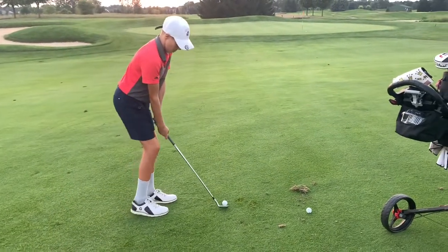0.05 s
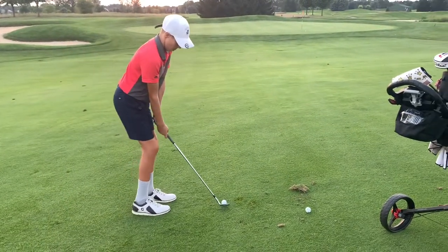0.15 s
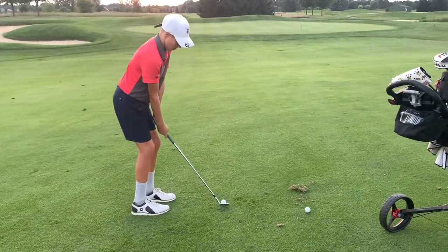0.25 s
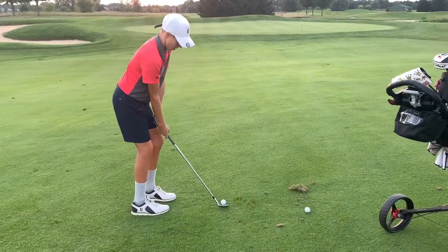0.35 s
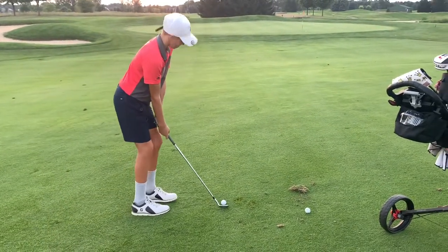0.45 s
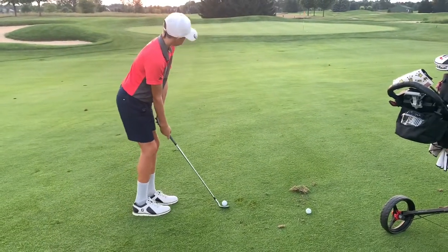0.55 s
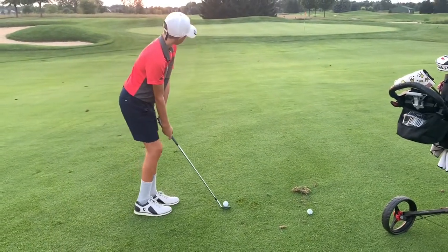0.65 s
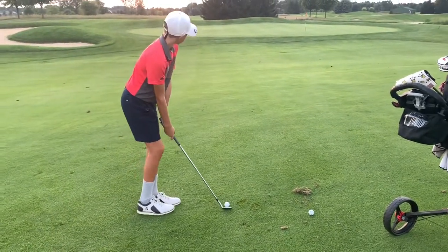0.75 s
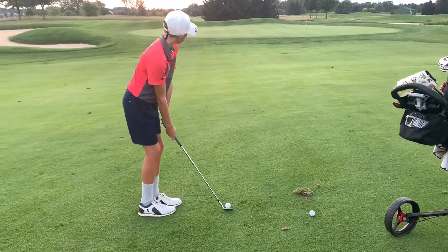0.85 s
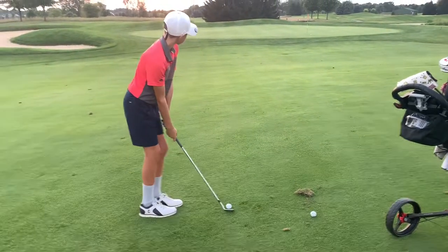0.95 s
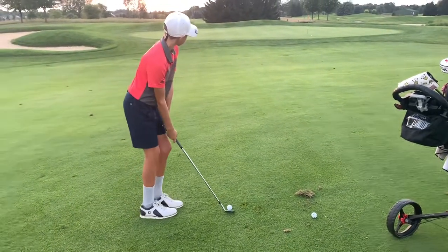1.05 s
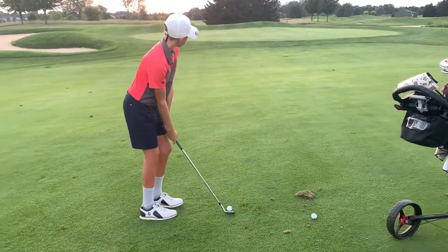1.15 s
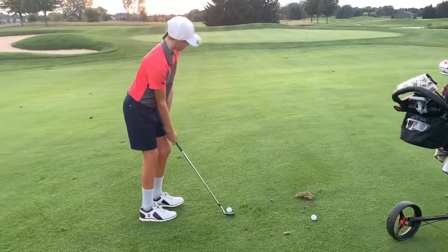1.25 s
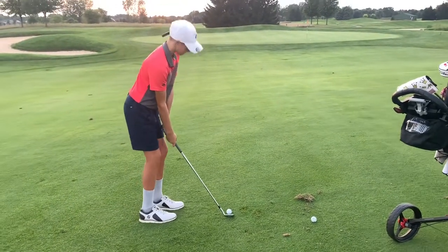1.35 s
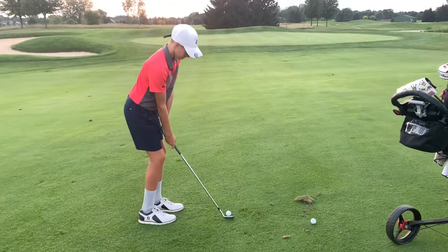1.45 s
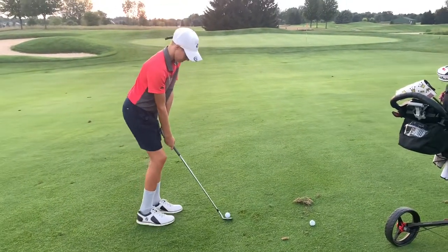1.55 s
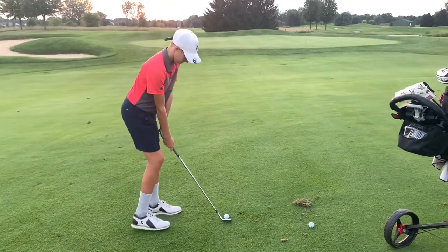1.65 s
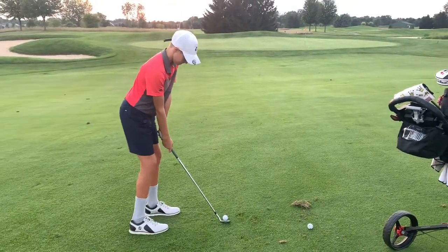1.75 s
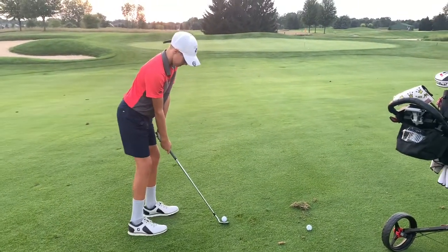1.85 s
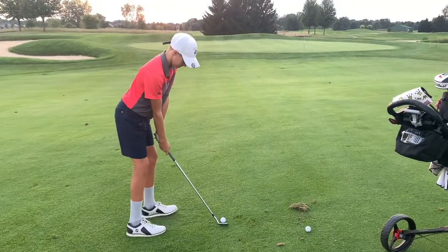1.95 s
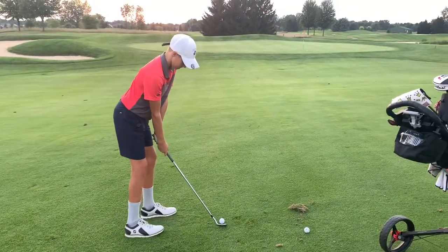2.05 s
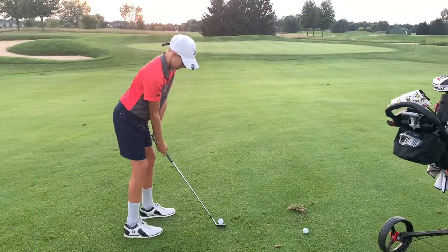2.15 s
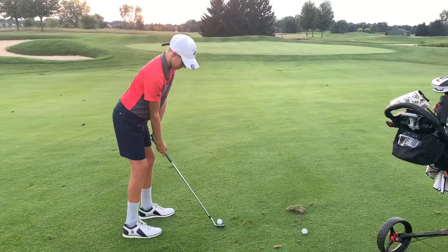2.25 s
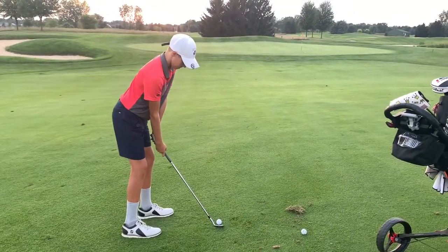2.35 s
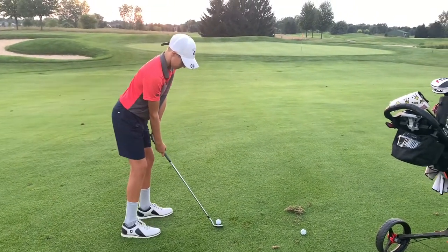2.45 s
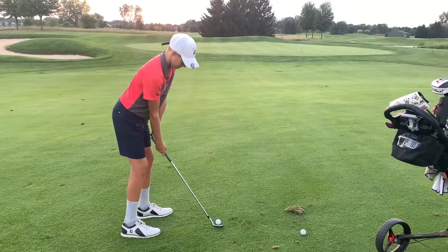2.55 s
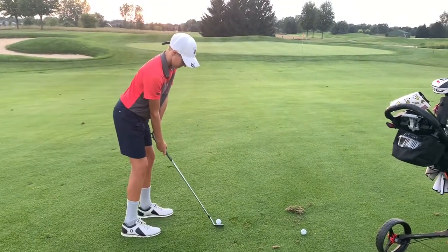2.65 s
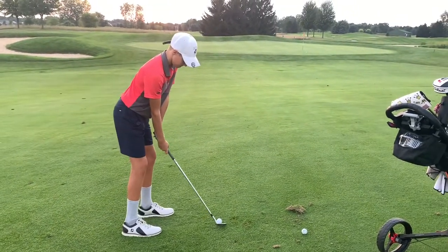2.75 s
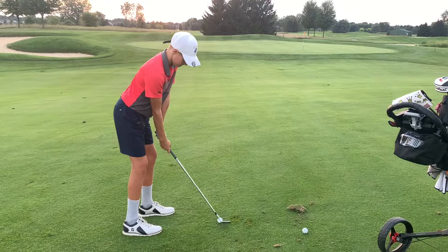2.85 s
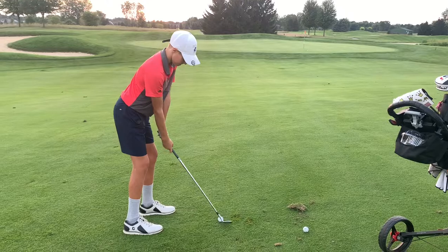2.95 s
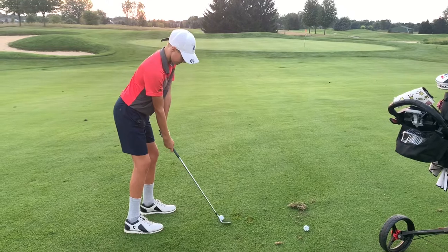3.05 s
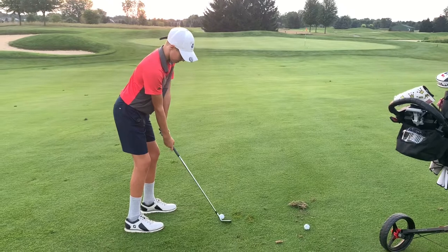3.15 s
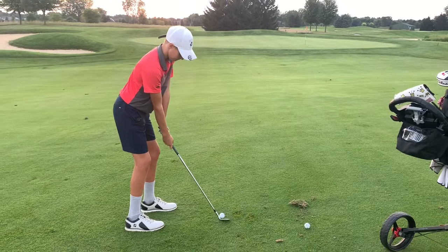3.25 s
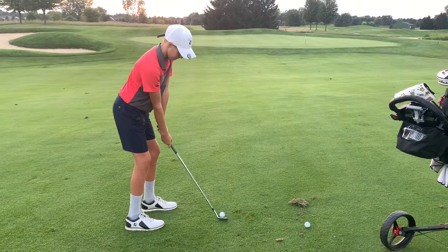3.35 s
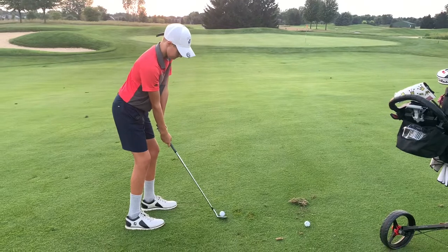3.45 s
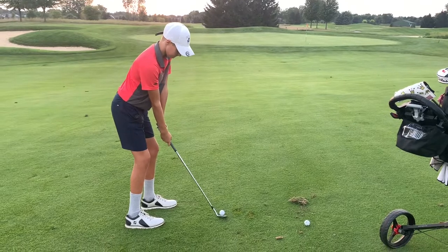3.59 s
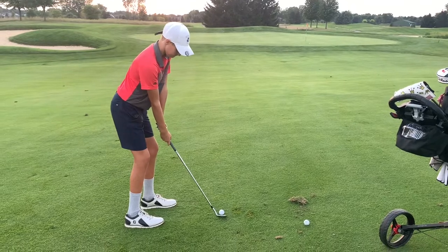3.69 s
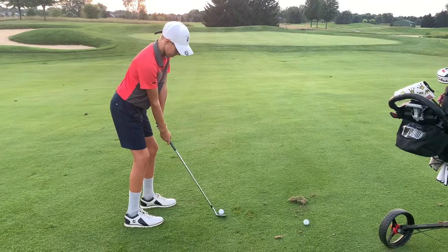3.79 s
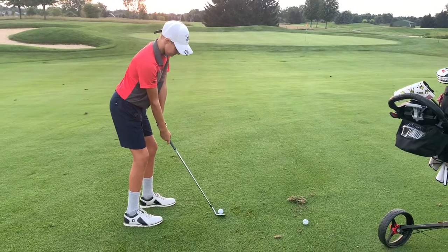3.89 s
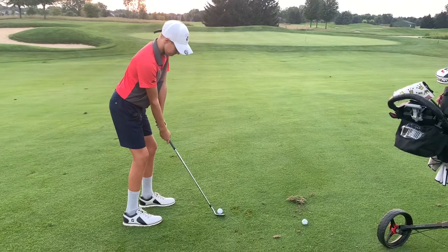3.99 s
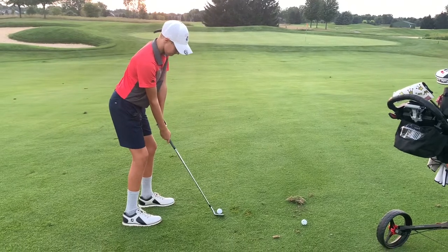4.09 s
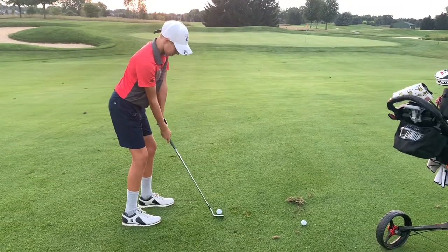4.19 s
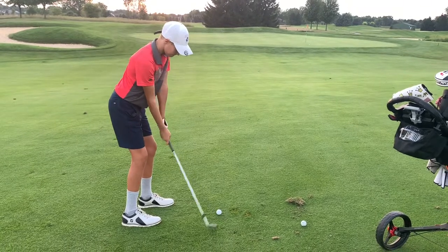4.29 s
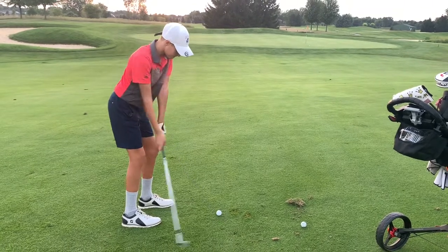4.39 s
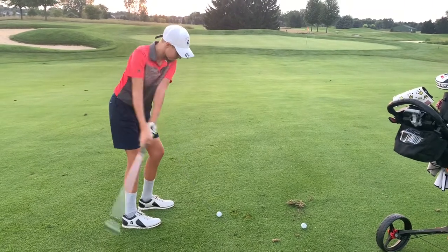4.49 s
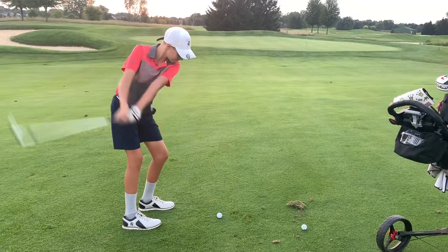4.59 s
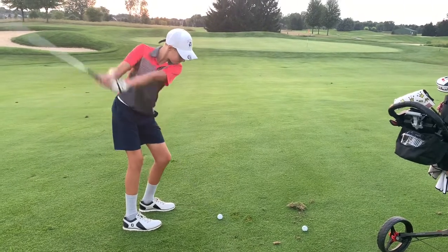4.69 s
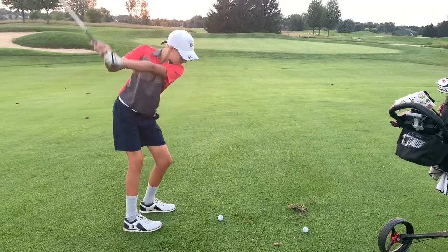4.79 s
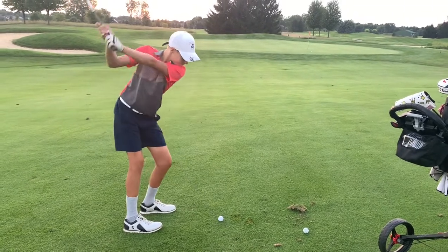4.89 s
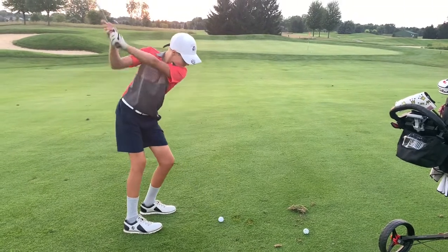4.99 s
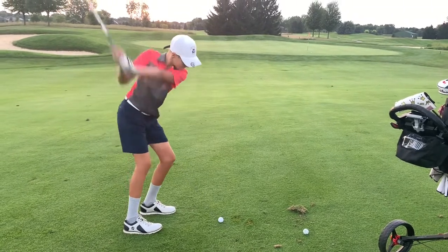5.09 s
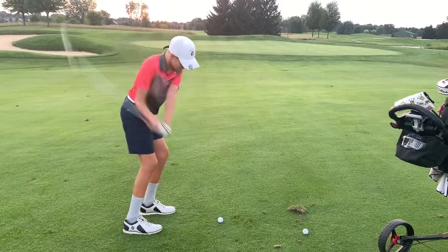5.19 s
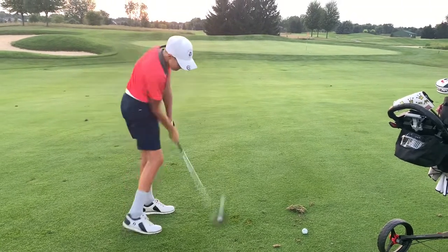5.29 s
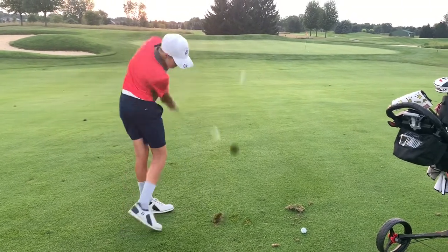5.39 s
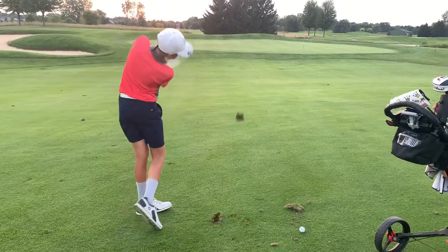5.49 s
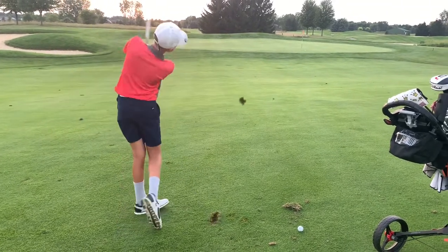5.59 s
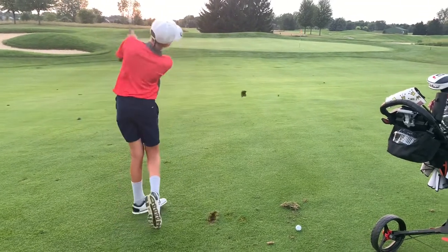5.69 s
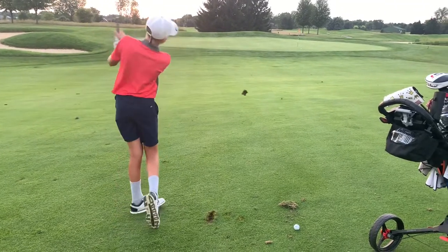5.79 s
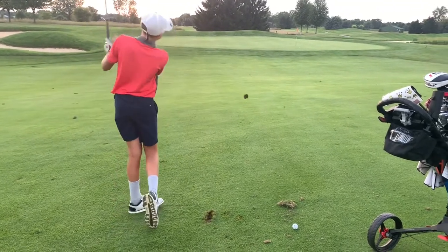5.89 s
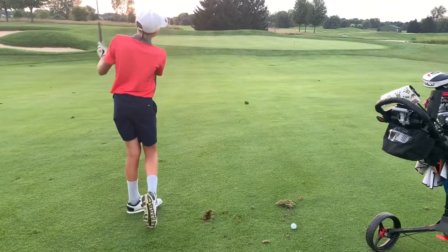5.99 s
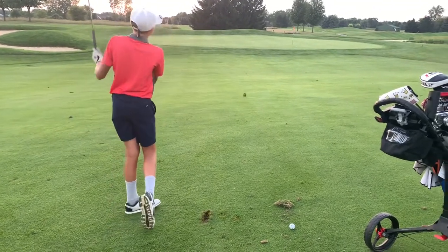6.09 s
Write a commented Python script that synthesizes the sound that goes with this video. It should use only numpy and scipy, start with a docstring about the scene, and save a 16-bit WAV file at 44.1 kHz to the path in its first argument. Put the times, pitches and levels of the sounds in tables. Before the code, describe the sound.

Faint clicks and cloth rustle over far traffic hum and thin bird calls, until a club swishes and cracks a ball off the grass.

```python
"""Golf shot from the turf

A golfer hits an iron shot a few steps from a pair of microphones: filtered noise makes the swing and
the torn grass, and short pushes ring the tones of the strike. Far off, a few low tones throb as an
engine, shaped noise hums as traffic and chirrs as insects, and gliding tones whistle as small birds.
Clothes, shoes and gear rustle as shaped noise and tick as short rings."""
import sys
import numpy as np
from scipy import signal
from scipy.fft import rfft, irfft, next_fast_len
from scipy.io import wavfile
from scipy.ndimage import uniform_filter1d

SR = 44100
rng = np.random.default_rng(int(sys.argv[2]) if len(sys.argv) > 2 else 0)


def persist_wave(psi):
    """Save psi, clipped to +-1, as 16-bit WAV."""
    counts = np.round(np.clip(psi, -1, 1) * 32767).astype(np.int16)
    wavfile.write(sys.argv[1], SR, np.atleast_2d(counts).T)


N = 270405  # length in samples


def gain_of(db):
    """Turns decibels into a factor on the wave."""
    return 10 ** (np.asarray(db) / 20)


def evened(x):
    """Scales a sound to an average (rms) level of 1."""
    return x / np.sqrt(np.mean(x ** 2) + 1e-20)


def read(points, hz):
    """Reads a frequency curve at hz, along a logarithmic pitch axis."""
    f, value = np.transpose(points)
    return np.interp(np.log(hz + 1), np.log(f + 1), value)


def along(rows):
    """Reads the columns of a time curve at every sample."""
    s, *columns = np.transpose(rows)
    return [np.interp(np.arange(N) / SR, s, c) for c in columns]


def add(mix, s, sound):
    """Adds a sound to the mix from s seconds on."""
    part = mix[round(s * SR):][:len(sound)]
    part += sound[:len(part)]


def swell(s, rise, hold, fall, db):
    """A level that is full from s on for the hold, with 20 dB slopes per rise and fall time."""
    t = np.arange(N) / SR - s
    return gain_of(db - 20 * np.maximum(np.maximum(-t / rise, (t - hold) / fall), 0))


def resonate(x, hz, width):
    """A resonance of gain 1: shifts the pitch hz down to zero, smooths, and shifts back."""
    turn = np.exp(2j * np.pi * np.cumsum(hz * np.ones(x.shape[-1])) / SR)
    r = np.exp(-np.pi * width / SR)
    return 2 * (turn * signal.lfilter([1 - r], [1, -r], x / turn)).real


def band(x, hz, width):
    """Two equal resonances in a row, brought to an average level of 1."""
    return evened(resonate(resonate(x, hz, width), hz, width))


def flutter(ms):
    """Smooth random wandering of unit spread that changes over ms milliseconds."""
    size = max(round(ms * SR / 1000), 1)
    return evened(uniform_filter1d(uniform_filter1d(rng.standard_normal(N), size), size))


# How much the two channels differ, for near sounds and for far ones.
# Each row: frequency in Hz, share of the power that is opposite in left and right (0 to 1).
NEAR_APART = [(60, .01), (300, 0.014), (1000, 0.064), (3000, 0.041), (5000, 0.17), (8000, 0.01),
              (15000, .02)]
FAR_APART = [(60, 0.009), (150, 0.082), (300, 0.21), (800, 0.53), (1500, 0.82), (2500, 0.46), (5500, 0.91),
             (8000, 0.017), (15000, .02)]


def white(apart):
    """Two channels of noise, alike but for a share that depends on frequency."""
    size = next_fast_len(N, True)
    alike, opposite = rfft(rng.standard_normal((2, size)))
    share = read(apart, np.fft.rfftfreq(size, 1 / SR))
    pair = np.sqrt(1 - share) * alike + np.sqrt(share) * np.array([opposite, -opposite])
    return irfft(pair, size)[:, :N]


def coloured(x, spectrum):
    """Shapes noise by a frequency curve in dB and brings it to an average level of 1."""
    size = next_fast_len(N, True)
    gain = gain_of(read(spectrum, np.fft.rfftfreq(size, 1 / SR)))
    return evened(irfft(rfft(x, size) * gain, size)[:, :N])


# Colour of distant traffic, with faint microphone hiss in the treble.
# Each row: frequency in Hz, relative level in dB per Hz.
HUM_COLOUR = [(18, -47), (30, -27.5), (43, -7.5), (70, -5), (150, -14), (260, -18), (355, -23.5),
              (844, -25), (1350, -37.5), (1680, -33.5), (2050, -44), (2800, -54), (3500, -64), (5900, -66),
              (7000, -61), (9000, -62), (11000, -60), (14000, -61), (16000, -79)]
# Loudness of the hum and hiss together. Each row: time in seconds, level in dB.
HUM_LEVEL = [(0, -50), (1, -53.5), (2, -52.5), (3, -52.5), (4, -53.5), (5, -52.5), (6.13, -50)]


def traffic():
    """A wide hum (and faint hiss) of shaped noise whose level drifts in patches of time and pitch."""
    _, _, grid = signal.stft(coloured(white(FAR_APART), HUM_COLOUR), nperseg=1024)
    patches = uniform_filter1d(rng.standard_normal(grid.shape[1:]), 8, 0)
    patches = evened(uniform_filter1d(patches, 8, 1))
    hum = signal.istft(grid * gain_of(2.1 * patches), nperseg=1024)[1][:, :N]
    return gain_of(along(HUM_LEVEL)[0]) * evened(hum)


# Tyres on a far road swell and pass.
# Each row: time in seconds, level in dB before a slight flutter, middle pitch in Hz.
TYRES = [(0, -86.5, 780), (1.5, -69.5, 754), (2.5, -66, 846), (3.5, -65, 856), (4.3, -62, 890),
         (5, -60.5, 870), (6.13, -64.5, 890)]


def road():
    """Tyre roar is noise gathered in one broad band of moving pitch."""
    db, hz = along(TYRES)
    return gain_of(db + 1.26 * flutter(40)) * band(white(FAR_APART), hz, 450)


# The engine tones that carry. Each row: multiple of the firing rate, relative level in dB.
ENGINE_TONES = [(3, 0), (4, 1.5), (5, -5)]
# Engine speed. Each row: time in seconds, firings per second.
ENGINE_SPEED = [(0, 19.7), (1.5, 19.73), (3.3, 19.79), (4.2, 19.92), (5.2, 19.8), (6.13, 19.7)]
# How the throb carries over the distance. Each row: time in seconds, level in dB,
# loss in dB for each multiple above the third, spread of the wavering in dB.
ENGINE_CARRY = [(0, -50, 0, 1.2), (1, -51, 1.5, 1.2), (2.4, -50.5, 0.2, 1.2), (2.8, -50.5, 4.5, 2.5),
                (3.8, -54, 5.5, 2.5), (4.7, -56, 1.5, 2.5), (5.45, -52, -1, 2.5), (6.13, -54, -1, 2.5)]


def engine():
    """Three low multiples of the firing rate survive the distance; higher ones arrive a little later."""
    firings = .07 + np.cumsum(along(ENGINE_SPEED)[0]) / SR
    level_db, loss_db, waver_db = along(ENGINE_CARRY)
    throb = np.zeros(N)
    for k, db in ENGINE_TONES:
        tone_db = level_db + db - loss_db * (k - 3) + waver_db * flutter(70)
        lag = .035 * (k - 4)  # in firings
        throb += np.sqrt(2) * gain_of(tone_db) * np.cos(2 * np.pi * k * (firings - lag))
    return throb


# Bands of the insect chorus. Each row: pitch in Hz, width of each resonance in Hz, relative level in dB.
INSECT_BANDS = [(4623, 530, -2.5), (5110, 440, -4)]
# Loudness of the chorus. Each row: time in seconds, level in dB.
INSECT_LEVEL = [(0, -66.5), (1, -70), (2, -69), (3, -69.5), (4, -70), (5, -69.5), (6.13, -66.5)]


def insects():
    """Bands of noise stand for many overlapping wing strokes, each band trembling on its own."""
    chorus = sum(gain_of(db + 1.8 * flutter(8)) * band(white(FAR_APART), hz, width)
                 for hz, width, db in INSECT_BANDS)
    return gain_of(along(INSECT_LEVEL)[0]) * chorus


# The climb of a whistle. Each row: share of the time after the hook, share of the rise in pitch,
# share of the swell in level.
WHISTLE_CLIMB = [(0, 0, 0), (.12, .22, .33), (.36, .35, .58), (.5, .46, .68), (.66, .59, .8),
                 (.76, .64, .8), (.84, .75, .83), (.95, 1, .97), (1, .95, 1)]
HOOK_UP_S, HOOK_DOWN_S = .016, .03
HOOK_FROM = .91  # first pitch, as a share of the top
SHOULDER_S, SHOULDER = .008, .975  # the hook is round: just before and after its top, this share of the top
END_S, END_DROP, END_DB = .014, .96, -25  # the abrupt end: seconds, share of the last pitch, change in dB


def whistle(start, length, top_hz, low_hz, last_hz, hook_db, low_db, last_db, late):
    """One call as time, pitch and level: a hook up and down, then a climb and swell to an abrupt end."""
    share, rise, grow = np.transpose(WHISTLE_CLIMB)
    hook = HOOK_UP_S + HOOK_DOWN_S
    climb_s = hook + share * (length - hook)
    climb_hz = low_hz + rise ** late * (last_hz - low_hz)
    climb_db = low_db + grow ** max(late, 1) * (last_db - low_db)
    s = [0, HOOK_UP_S - SHOULDER_S, HOOK_UP_S, HOOK_UP_S + SHOULDER_S, *climb_s, length + END_S]
    shoulder_hz = SHOULDER * top_hz
    hz = [HOOK_FROM * top_hz, shoulder_hz, top_hz, shoulder_hz, *climb_hz, END_DROP * last_hz]
    db = [hook_db - 15, hook_db - 2.5, hook_db, hook_db - 2.5, *climb_db, last_db + END_DB]
    return start + np.array(s), hz, db


# Whistled calls. Each row: start in seconds, length in seconds, top of the hook in Hz, low pitch in Hz,
# last pitch in Hz, then the levels of hook, low and last in dB (all birds are later raised together),
# lateness of the climb (1 is even), phase in radians added on the left and taken off on the right.
WHISTLES = [(.42, .26, 4600, 4500, 4480, -90, -84, -77, 1, .07),
            (.998, .45, 4680, 4040, 4550, -49, -80, -49.5, .8, 0),
            (1.968, .06, 6900, 6600, 6600, -82, -95, -99, 1, 0),
            (3.6, .466, 4710, 4090, 4570, -53, -80, -51, 1, 0),
            (3.905, .275, 4700, 4200, 4540, -69, -82, -67, 2.2, .13),
            (5.4, .47, 7270, 6550, 7050, -84, -106, -88, 2, 0)]
# Wavering tunes, one curve each. Each row of a curve: time in seconds, pitch in Hz, level in dB (as above).
TUNES = [
    [(1.885, 4640, -76), (1.9, 4630, -69), (1.916, 4020, -73), (1.93, 3880, -74), (1.95, 3830, -75),
     (2.01, 4060, -72), (2.028, 3980, -69), (2.1, 4020, -72), (2.13, 4030, -68), (2.165, 4140, -68),
     (2.212, 3970, -65), (2.235, 4030, -76)],
    [(1.975, 4600, -80), (1.99, 4560, -74), (2.012, 4060, -74), (2.06, 4130, -70), (2.1, 4120, -73),
     (2.14, 4370, -74), (2.21, 4360, -74), (2.25, 4460, -72), (2.34, 4510, -69), (2.38, 4500, -72),
     (2.42, 4620, -71), (2.5, 4560, -73), (2.55, 4630, -68), (2.61, 4600, -76)],
    [(2.3, 4420, -78), (2.34, 4380, -74), (2.38, 4240, -76), (2.43, 4310, -73), (2.56, 4310, -72),
     (2.62, 4480, -72), (2.67, 4700, -69), (2.7, 4700, -80)],
    [(4.625, 4400, -78), (4.64, 4520, -70), (4.665, 4110, -75), (4.71, 4130, -74), (4.77, 4290, -75),
     (4.81, 4270, -77), (4.85, 4240, -67), (4.92, 4340, -74), (4.98, 4460, -69), (5.035, 4630, -62),
     (5.05, 4600, -65), (5.062, 4500, -85)],
    [(5.4, 4600, -78), (5.415, 4760, -69), (5.44, 4180, -77), (5.49, 4120, -86), (5.53, 4150, -76),
     (5.6, 4230, -81), (5.64, 4420, -74), (5.72, 4450, -80), (5.8, 4530, -75), (5.865, 4710, -70),
     (5.91, 4600, -76), (5.955, 4700, -71), (5.97, 4650, -82)],
]
# One value per tune: phase in radians added on the left and taken off on the right.
TUNE_BEARINGS = [0, 1.7, 1.7, .48, .17]


def birds():
    """Near-sine whistles with a slight waver and a faint smear from the trees."""
    out = np.zeros((N, 2))
    waver, tremble, wander = flutter(3), flutter(7.6), flutter(25)
    calls = [(whistle(*row[:-1]), row[-1]) for row in WHISTLES]
    calls += [(np.transpose(tune), bearing) for tune, bearing in zip(TUNES, TUNE_BEARINGS)]
    for (s, hz, db), bearing in calls:
        t = np.arange(s[0], s[-1], 1 / SR)
        at = (t * SR).astype(int)
        loud_db = np.interp(t, s, db)
        # faint birds are far away, and the air between breaks them up more
        faint = np.clip(-63.5 - loud_db, 0, 12)
        pitch = uniform_filter1d(np.interp(t, s, hz), 300, mode="nearest")
        pitch = pitch * (1 + 0.0016 * waver[at] + .0006 * faint * wander[at])
        level = gain_of(loud_db + (.65 + .3 * faint) * tremble[at])
        level = level * signal.windows.tukey(len(t), 400 / len(t))  # soft start and end
        angle = 2 * np.pi * np.cumsum(pitch) / SR + bearing * np.array([[1], [-1]])
        add(out, s[0], (np.sqrt(2) * level * np.sin(angle)).T)
    # the trees: noise that starts 12 ms late and dies by 60 dB per .31 s
    t = np.arange(SR // 4) / SR
    trees = rng.standard_normal((2, len(t))) * gain_of(-60 * t / 0.31) * (t > .012)
    trees = trees / np.linalg.norm(trees[0])
    smear = signal.oaconvolve(out.T, trees, axes=1)[:, :N]
    return gain_of(1) * (out.T + gain_of(-15.5) * smear)


# Small ticks of gear. Each row: start in seconds, level in dB before a boost shared by all ticks,
# pitch in Hz, cycles until the ring has lost 30 dB.
GEAR_TICKS = [(.008, -55, 5700, 35), (.008, -52, 6500, 40), (.008, -58, 7900, 40), (.058, -56, 6800, 30),
              (.061, -55, 6300, 35), (0.569, -54, 2520, 13), (.627, -57, 2800, 8), (.807, -55, 2300, 7),
              (.809, -56, 1900, 8), (.836, -46, 1300, 3), (.836, -48, 3000, 9), (.8375, -47, 2000, 9),
              (.8402, -44.5, 2200, 14), (.8488, -43, 2260, 14), (.8425, -51, 3100, 8), (.846, -52, 2800, 7),
              (.846, -54, 3900, 9), (.852, -49.5, 3800, 10), (.8565, -52, 2600, 7), (.861, -50, 2900, 7),
              (.861, -54, 2000, 7), (.867, -52, 2600, 9), (.876, -53, 2500, 8), (.951, -45, 800, 4),
              (0.9894, -46, 5200, 2.3), (1.493, -47, 840, 5), (1.508, -44, 1500, 4.5),
              (1.513, -52, 1700, 8), (1.533, -45, 1400, 4.5), (1.553, -52, 1900, 5), (1.567, -63, 3100, 12),
              (2.185, -66, 3400, 9.2), (2.291, -40, 900, 4.5), (2.708, -44, 800, 4), (4.22, -46, 650, 4),
              (3.4286, -40.5, 4730, 4.6), (5.56, -47, 1150, 5), (5.027, -54, 3100, 3.5),
              (5.071, -43, 3000, 3), (5.071, -45, 4400, 9), (6.114, -34.5, 2000, 3.3),
              (6.124, -37.5, 1660, 16)]
# Hollow knocks. Each row: start in seconds, level in dB (as above), lowest pitch in Hz,
# extra level of the lowest tone in dB.
HOLLOW_KNOCKS = [(.7497, -43, 1060, 6.5), (1.616, -56, 1060, 0), (1.7088, -43.5, 1070, -10)]
# Tones of a hollow knock. Each row: multiple of the lowest pitch, relative level in dB, cycles (as above).
HOLLOW_TONES = [(1, 0, 4.5), (2.1, -6, 12), (2.42, 2, 12), (2.75, -3, 13)]
# One bright snap of metal. Each row: pitch in Hz, level in dB (as above), cycles (as above).
METAL_SNAP = [(2920, -57, 12), (3480, -70, 220), (6000, -48, 12), (7900, -45.5, 21), (10000, -49, 68)]
SNAP_S = 1.4706  # start in seconds


def ticks():
    """Each tick is a short rough ring: a dying tone shaken by noise, with a soft start."""
    out, t = np.zeros(N), np.arange(1500) / SR
    rings = list(GEAR_TICKS)
    for s, db, hz, low_db in HOLLOW_KNOCKS:
        for k, tone_db, cycles in HOLLOW_TONES:
            rings.append((s, db + tone_db + low_db * (k < 1.5), hz * k, cycles))
    rings += [(SNAP_S, db, hz, cycles) for hz, db, cycles in METAL_SNAP]
    for s, db, hz, cycles in rings:
        start_cycles = np.clip(cycles / 3.5, 1.7, 3)
        soft_start = np.sin(np.pi / 2 * np.minimum(t * hz / start_cycles, 1)) ** 2
        fade = gain_of(-30 * t * hz / cycles) * soft_start
        shake = band(rng.standard_normal(len(t)), hz, 2 * hz / cycles)
        add(out, s, gain_of(db + 4.5) * fade * (np.sin(2 * np.pi * hz * t) + 0.17 * shake))
    return out


# Crunches and scuffs of gear, bursts of fine grains. Each row: time of the peak in seconds,
# rise in seconds, fall in seconds, level in dB, pitch in Hz, width of each resonance in Hz, lumpiness in dB.
GEAR_CRUNCHES = [(.22, 0.079, .07, -53.5, 5380, 696, 0), (.22, .06, .07, -70, 6940, 600, -1),
                 (.22, 0.067, 0.058, -71, 14400, 2500, 1.5), (.808, .003, .008, -64, 1800, 1300, 4),
                 (0.838, 0.002, 0.035, -60, 2600, 2000, 6), (1.2, 0.078, 0.091, -76.5, 6160, 1200, 2.5),
                 (1.475, .003, 0.017, -67, 9600, 1200, 6), (1.52, 0.02, 0.047, -70, 1500, 1200, 5),
                 (1.555, .005, 0.015, -77, 3700, 800, 2.5), (5.93, 0.011, 0.018, -54, 940, 200, 2),
                 (6.124, 0.0047, 0.022, -45, 1300, 2400, 5.5)]


def crunches():
    """Lumpy noise in one resonant band under a lopsided bell of level."""
    out, t = np.zeros((N, 2)), np.arange(N) / SR
    noise, lumps = white(NEAR_APART), flutter(1.3)
    for s, rise, fall, db, hz, width, lumpy_db in GEAR_CRUNCHES:
        near = slice(max(round((s - 3 * rise) * SR), 0), round((s + 3 * fall) * SR))
        bell = np.exp(-((t[near] - s) / np.where(t[near] < s, rise, fall)) ** 2)
        grains = noise[:, near] * gain_of(lumpy_db * lumps[near])
        add(out, t[near][0], (gain_of(db) * bell * band(grains, hz, width)).T)
    return out.T


# Rubbing near the microphones. Each row: time of full level in seconds, rise, hold and fall in seconds,
# level in dB, brightness from 0 (dull cloth) to 1 (crisp grass).
RUBS = [(0, .1, .1, .3, -60, .01), (.5, .2, .25, .3, -74, .02), (.2, .22, .02, .27, -51, .008),
        (1.1, .9, .5, 1.5, -78, .55), (3.25, .05, .09, .045, -72, 1), (3.47, .1, .07, .045, -71, 1),
        (4.22, .07, .004, .06, -76, 1), (4.715, .018, .004, .07, -59.5, 1), (4.5, 1.2, .4, .5, -83, .45),
        (5.05, .3, .004, .25, -72.5, .45), (5.4, .33, .004, .2, -68, .35), (5.5, .2, .2, .2, -72, .25),
        (5.958, .02, .002, .025, -55, .95), (5.925, .03, .12, .12, -59.5, .82)]
# Colours of dull cloth and of crisp grass. Each row: frequency in Hz, relative level in dB per Hz.
CLOTH_COLOUR = [(200, -6), (350, -3), (1250, -6.5), (1900, -18), (2400, -1), (2700, -4), (3050, 0),
                (3400, -11), (3900, -17), (4800, -14.5), (5500, -17.5), (6100, -28), (7000, -21),
                (9000, -32), (12000, -42.5), (15500, -37)]
GRASS_COLOUR = [(300, 3.5), (1000, 9.5), (3000, -13), (5000, -8.5), (7000, -1.5), (9000, -11), (10500, -3),
                (12000, -10), (13500, -13), (15300, -9), (16000, -20)]


def rustle():
    """Friction as noise: smooth dull cloth and grainy crisp grass blend by brightness."""
    power = np.array([swell(*row[:-1]) ** 2 for row in RUBS])
    bright = np.array(RUBS)[:, -1]
    grains = gain_of(3.2 * flutter(1.5) + 1.8 * flutter(15))
    cloth = coloured(white(NEAR_APART), CLOTH_COLOUR)
    grass = coloured(white(NEAR_APART) * grains, GRASS_COLOUR)
    return np.sqrt((1 - bright) @ power) * cloth + np.sqrt(bright @ power) * grass


# Shaft and arms stirring the air. Each row: time of full level in seconds, rise, hold and fall in seconds,
# level in dB before the strands are weighted, pitch in Hz that the strands lie around.
AIR_MOANS = [(5.27, .05, .05, .065, -50, 330), (5.455, .055, .15, .3, -49.5, 315),
             (5.945, .09, .1, .06, -49.5, 315), (6.125, .07, .01, .05, -50, 300)]
# The head hisses through air, then tears the grass. Each row: time of full level in seconds,
# rise, hold and fall in seconds, level in dB before a fast flutter.
HEAD_SWISHES = [(5.3, .04, .05, .035, -63), (5.3255, .0035, .0055, .011, -30)]
# Colour of hiss and rip. Each row: frequency in Hz, relative level in dB per Hz.
RIP_COLOUR = [(300, -40), (1000, -22), (1800, -17), (2400, -27), (3200, -14), (5000, -11), (7600, -10),
              (10400, -9), (13000, -14), (15500, -14)]


def swing():
    """Vortices shed by shaft and arms moan low in a few fuzzy strands; the head hisses, then rips grass."""
    levels = np.array([swell(*row[:-1]) for row in AIR_MOANS])
    # the loudest moan sets the pitch
    hz = uniform_filter1d(np.array(AIR_MOANS)[levels.argmax(0), -1], 2000)
    strands = sum(gain_of(db + 2.2 * flutter(27)) * band(white(NEAR_APART), hz * k, 90)
                  for k, db in ((.78, -2), (1.02, 3), (1.35, -7)))
    rip = coloured(white(NEAR_APART), RIP_COLOUR) * gain_of(3.3 * flutter(0.19))
    return levels.sum(0) * evened(strands) + sum(swell(*row) for row in HEAD_SWISHES) * rip


# Short pushes of the strike: light ones first, the strongest at 5.3296 s, then weaker ones.
# Each row: start of the push in seconds, relative force in dB.
PUSHES = [(5.3244, -27), (5.3256, -22), (5.3269, -11), (5.3279, -14), (5.3296, -6.5), (5.3327, -24),
          (5.3338, -17), (5.3349, -18), (5.337, -25)]
# Grit knocking the head as it ploughs the soil. One row: time of full level in seconds,
# rise, hold and fall in seconds, relative force in dB.
SOIL_GRIT = (5.326, .004, .007, .007, -35)
# Tones of head, ball and soil. Each row: pitch in Hz, relative level in dB, seconds to fall by 60 dB.
STRIKE_TONES = [(255, -8.5, 0.05), (335, 3, 0.024), (446, -1.5, 0.023), (631, -13, .025), (1045, 0, .018),
                (1183, -12, .014), (1303, -18, .014), (1710, -13, 0.013), (1882, -7, .013),
                (2170, -17, .012), (2610, -14, .016), (2980, -8, 0.022), (3480, -4, 0.022), (3900, -3, .02),
                (4480, 3, .02), (5280, -1, .018), (5930, 2, .018), (6360, 0, .018), (6770, 8, .018),
                (7700, 5, .016)]


def strike():
    """Short smooth pushes and grit ring the tones; so small a body has little bass, but the soil thuds."""
    t = np.arange(8000) / SR
    force = swell(*SOIL_GRIT) * flutter(.1)
    for s, db in PUSHES:
        add(force, s, gain_of(db) * np.hanning(21))  # about half a millisecond wide
    ring = sum(gain_of(db - 60 * t / t60) * np.sin(2 * np.pi * hz * t) for hz, db, t60 in STRIKE_TONES)
    bass_cut = signal.butter(3, 225, "high", fs=SR, output="sos")
    rung = signal.sosfilt(bass_cut, signal.oaconvolve(force, ring)[:N])
    thud = np.zeros(N)
    thud_level = gain_of(-25.5 - 60 * t / 0.099) * np.minimum(t / 0.0044, 1)
    add(thud, 5.332, thud_level * np.sin(2 * np.pi * 105 * t))
    return thud + gain_of(-28.8) * rung


def scene():
    """Adds the far background, the gear and clothes nearby, and the shot."""
    far = traffic() + road() + engine() + insects() + birds()
    near = ticks() + crunches() + rustle()
    return far + near + swing() + strike()


# Phase between the two microphones. Each row: frequency in Hz, radians by which the left leads the right.
PAIR_PHASE = [(0, 0), (500, .1), (1100, .5), (2200, .8), (3800, 1.5), (4200, .7), (4700, .9), (5600, 1.8),
              (6400, .4), (7300, -1.2), (8600, -3.1), (9700, -4.6), (10600, -6.2), (11600, -6.4),
              (13100, -9.4), (14200, -9.5), (15200, -12.5)]
# Balance between the two microphones. Each row: frequency in Hz, left minus right in dB.
PAIR_BALANCE = [(60, 2.5), (200, 0.5), (400, 0.5), (900, 6), (1500, -1), (2500, 0), (4500, -1.5),
                (6500, -0.5), (15000, 0)]


def record(dry):
    """The two microphones shift phase and level against each other; then the top treble is cut off."""
    size = next_fast_len(N, True)
    hz = np.fft.rfftfreq(size, 1 / SR)
    phase = np.interp(hz, *np.transpose(PAIR_PHASE))
    # each side takes half of the difference
    half = np.exp(.5j * phase) * gain_of(read(PAIR_BALANCE, hz) / 2)
    pair = irfft(rfft(dry, size) * np.array([half, 1 / half]), size)[:, :N]
    treble_cut = signal.firwin(511, 16150, window=("kaiser", 9), fs=SR)
    return signal.oaconvolve(pair, treble_cut[None], "same")


dry = scene()
out = record(dry)
persist_wave(out)
```